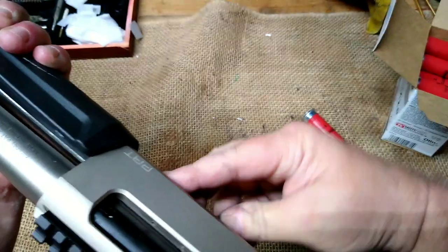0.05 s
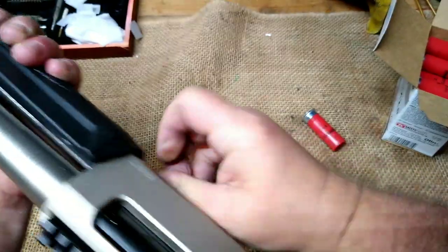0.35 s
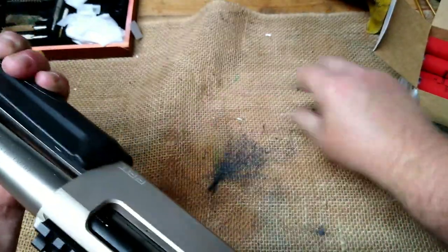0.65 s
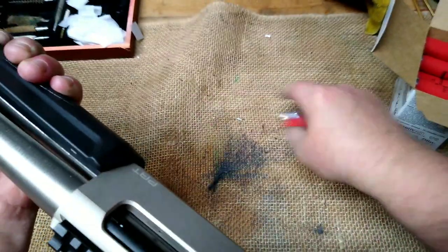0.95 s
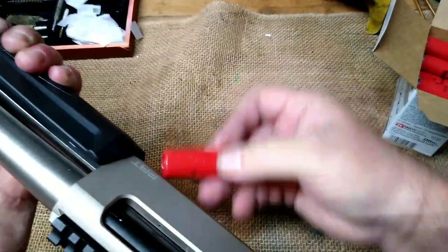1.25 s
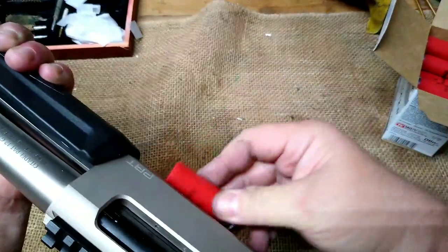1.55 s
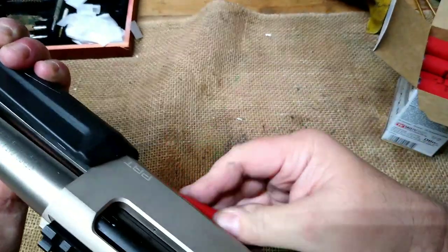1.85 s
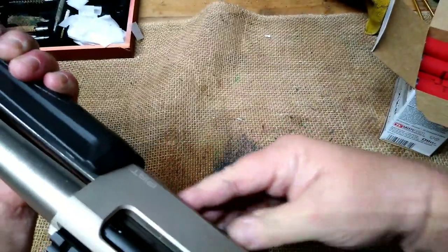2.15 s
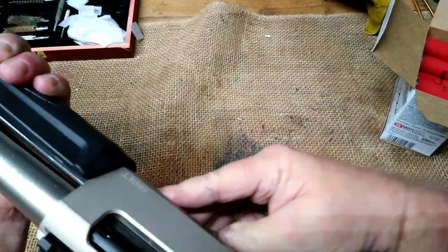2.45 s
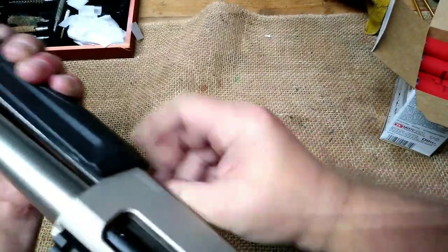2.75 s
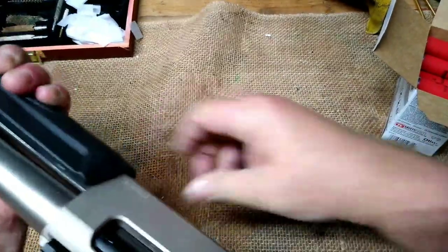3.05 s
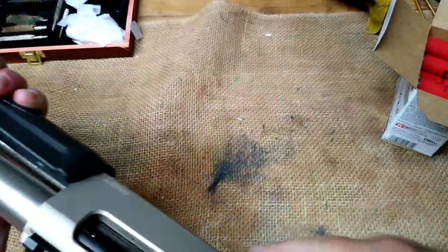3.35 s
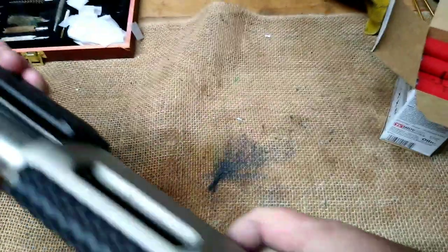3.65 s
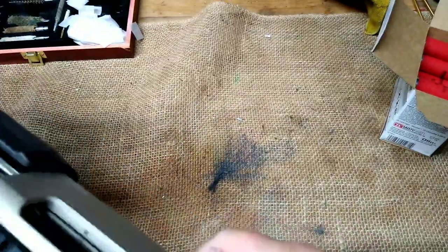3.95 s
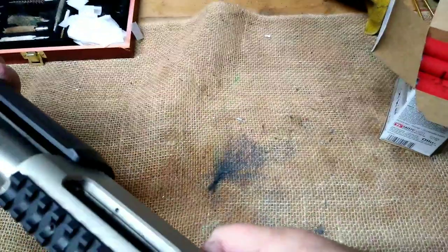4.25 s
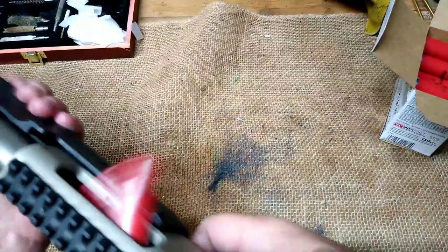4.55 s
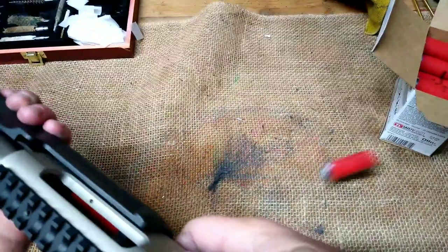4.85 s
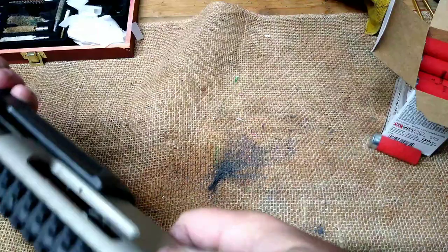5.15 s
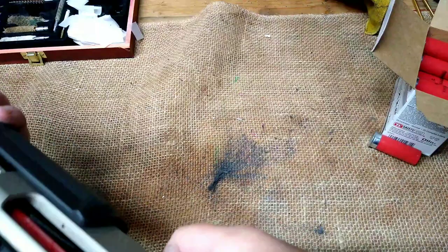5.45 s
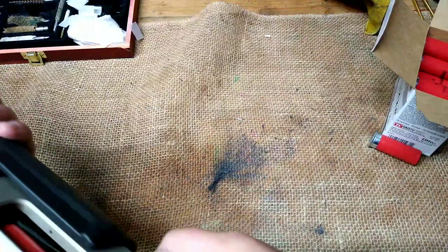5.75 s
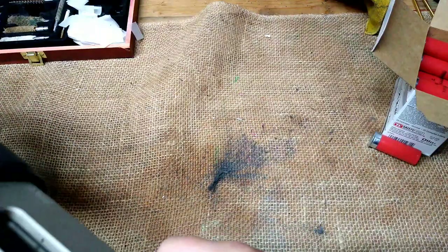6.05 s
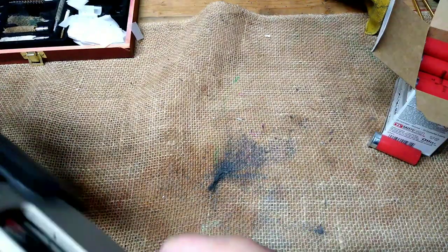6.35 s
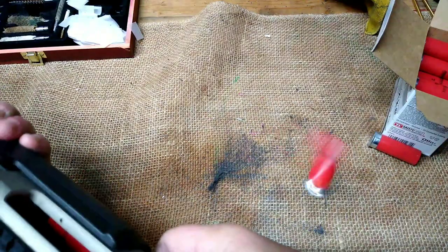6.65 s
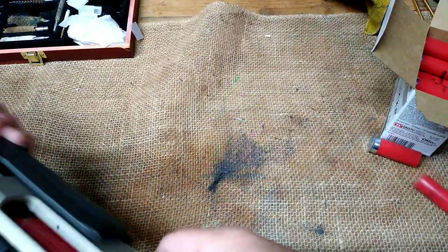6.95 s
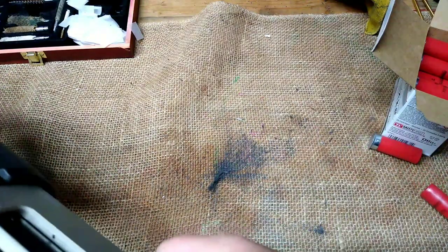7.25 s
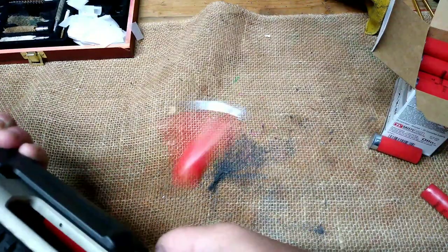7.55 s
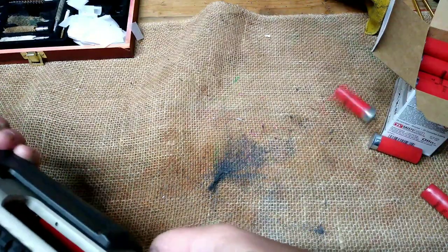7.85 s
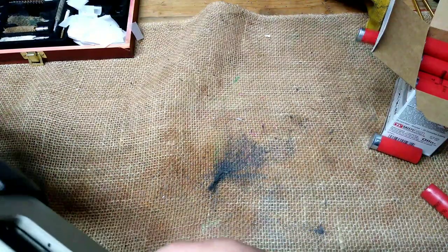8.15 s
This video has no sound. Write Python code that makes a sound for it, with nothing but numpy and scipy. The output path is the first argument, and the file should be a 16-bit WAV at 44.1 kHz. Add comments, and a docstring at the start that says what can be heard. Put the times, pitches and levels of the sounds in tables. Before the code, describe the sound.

In a small room, close to the microphone, a pump shotgun is handled with soft rustling and light clicks. Two shells scrape and squeak into the magazine tube and snap into place. Then the action is pumped three times, the last two in quick succession: rails rasp, steel parts clack hard and the barrel rings briefly. After each pull, a shell lands with a dull knock on cloth over wood.

```python
"""Loading and racking a pump shotgun.

Two shells are thumbed into the magazine, scraping and squeaking until the latch snaps. The slide is
then racked three times: the steel action clacks, the barrel rings, and each ejected shell thuds on a
cloth-covered wooden bench. Small room; close microphone with a limiter and little treble above 8 kHz."""
import sys
import numpy as np
from scipy import signal
from scipy.fft import rfft, irfft
from scipy.io import wavfile
from scipy.ndimage import uniform_filter1d, minimum_filter1d

SR = 44100
rng = np.random.default_rng(int(sys.argv[2]) if len(sys.argv) > 2 else 0)


def materialize(psi):
    """Save the field psi as 16-bit PCM at rate SR to the path in sys.argv[1].

    A 1-D psi becomes a single channel; in a 2-D psi each row is a channel.
    """
    bounded = np.clip(np.atleast_2d(psi).T, -1, 1)
    quanta = np.round(bounded * 32767).astype(np.int16)
    wavfile.write(sys.argv[1], SR, quanta)


N = 370862
TIME_S = np.arange(N) / SR
AGE_S = np.arange(2 ** 15) / SR  # time since a blow
SCENE_HZ, BLOW_HZ = np.fft.rfftfreq(N, 1 / SR), np.fft.rfftfreq(len(AGE_S), 1 / SR)


def amp(db):
    """Decibels to gain."""
    return 10 ** (np.asarray(db) / 20)


def unit_rms(x):
    """Scales to rms 1."""
    return x / np.sqrt(np.mean(x ** 2) + 1e-20)


def curve(points, hz):
    """Interpolates (f, value) points over log frequency."""
    f, value = np.transpose(points)
    return np.interp(np.log(hz + 1), np.log(f), value)


def add(mix, t_s, sound):
    """Mixes a sound in at t_s."""
    part = mix[max(round(t_s * SR), 0):][:len(sound)]
    part += sound[:len(part)]


def colour(x, gain_db):
    """Minimum-phase filter, one gain per bin: nothing sounds before the blow."""
    cepstrum = irfft(np.log(amp(gain_db)), len(x))
    cepstrum[1:len(x) // 2] *= 2
    cepstrum[len(x) // 2 + 1:] = 0
    return irfft(rfft(x) * np.exp(rfft(cepstrum)), len(x))


def noise(spectrum):
    """Steady shaped noise, rms 1."""
    return unit_rms(irfft(rfft(rng.standard_normal(N)) * amp(curve(spectrum, SCENE_HZ)), N))


def flutter(count, smooth_samples):
    """Smoothed random wander, rms 1."""
    return unit_rms(uniform_filter1d(rng.standard_normal(count), size=smooth_samples))


def decay(t60_s):
    """Envelope falling 60 dB in t60_s."""
    return np.exp(-np.log(1000) * AGE_S / max(t60_s, 1e-3))


def bell(hz, centre_hz, width_hz):
    """Resonance curve, 0-1."""
    return 1 / (1 + ((hz - centre_hz) / width_hz) ** 2)


def favour(modes, spot_hz, boost_db):
    """The struck spot drives modes near one pitch harder."""
    return [(hz, db + boost_db * bell(hz, spot_hz, width_hz=36), t60_s) for hz, db, t60_s in modes]


def ring(modes, spread_db=1.0):
    """Damped modes, starting rms 1; each blow shares its energy differently."""
    hz, db, t60_s = np.transpose(modes)
    gains = amp(db + spread_db * rng.standard_normal(len(hz)))
    phases = rng.uniform(0, 2 * np.pi, len(hz))
    sound = sum(gain * np.sin(2 * np.pi * f * AGE_S + phase) * decay(t60)
                for gain, f, t60, phase in zip(gains, hz, t60_s, phases))
    return sound / np.sqrt(np.sum(gains ** 2) / 2)


# noise spectra: f/Hz, level/dB
HUSH_SPECTRUM = [(20, -63), (45, -10.5), (80, -8.5), (150, 3), (230, 4), (330, -1.5), (500, -3.5),
                 (750, -20.5), (1500, -18), (8000, -56.5)]
RUSTLE_SPECTRUM = [(100, -3), (600, 0), (1100, 0.5), (2000, -4.5), (3200, -9.5), (4500, -16), (7500, -25.5),
                   (16000, -57)]
RUMBLE_SPECTRUM = [(20, -23), (50, -2.5), (80, 9.5), (120, 1), (170, 5), (260, -3.5), (400, -18),
                   (900, -45)]
# rustle envelope: t/s, level/dB
RUSTLE_LEVELS = [(0.1, -49.5), (0.39, -55), (0.54, -41), (0.89, -52.5), (1.14, -55), (1.67, -48.5),
                 (2.0, -51.5), (2.28, -44.5), (2.52, -54.5), (2.87, -49), (3.06, -45.5), (3.25, -51.5),
                 (4.05, -48.5), (4.24, -46.5), (4.49, -50.5), (4.6, -51)]


def background(hush_db=-47, rumble_from_s=6.16, rumble_db=-34.5, rest_db=-60.5, ease_db_per_s=4.5):
    """Room hush, rustling hands, and a rumble of hard handling that slowly eases."""
    hush = amp(hush_db) * noise(HUSH_SPECTRUM)
    rustle = amp(np.interp(TIME_S, *np.transpose(RUSTLE_LEVELS)) - 1) * noise(RUSTLE_SPECTRUM)
    worked_s = TIME_S - rumble_from_s
    rumble_gain = amp(np.where(worked_s > 0, rumble_db - ease_db_per_s * worked_s, rest_db))
    return hush + rustle + rumble_gain * noise(RUMBLE_SPECTRUM)


# room decay: f/Hz, t60/s
ROOM_DECAY = [(100, 0.44), (400, 0.31), (1500, 0.31), (4000, 0.25), (8000, 0.31)]


def room(x, first_s=0.0031, echoes_per_s=3000):
    """Sparse reflections of random sign; each band decays at its own rate."""
    signs = rng.choice([-1., 1.], len(AGE_S))
    arrivals = (rng.random(len(AGE_S)) < echoes_per_s / SR) * (AGE_S > first_s)
    hz, t_s, bands = signal.stft(signs * arrivals, SR, nperseg=256)
    fade = np.exp(-np.log(1000) * t_s / curve(ROOM_DECAY, hz)[:, None])
    tail = signal.istft(bands * fade, SR, nperseg=256)[1]
    return signal.fftconvolve(x, tail / np.linalg.norm(tail))[:N]


def rub(strokes, spectrum, swell_db_per_s, release_s, catch_db=0, grain_db=5, attack_s=0.004):
    """Sliding friction: fine slips and coarser catches; each stroke swells to its end, then dies."""
    slips = rng.standard_normal(N) * amp(grain_db * flutter(N, 30))
    catches = amp(catch_db * flutter(N, 250))
    envelope = np.zeros(N)
    for start_s, end_s, db in strokes:
        attack = np.clip((TIME_S - start_s) / attack_s, 0, 1)
        swell = amp(db - swell_db_per_s * np.maximum(end_s - TIME_S, 0))
        release = np.exp(-np.maximum(TIME_S - end_s, 0) / release_s)
        envelope += attack * swell * release
    return envelope * unit_rms(colour(slips * catches, curve(spectrum, SCENE_HZ)))


# shell pushes: start/s, end/s, final level/dB
FEED_STROKES = [(0.012, 0.022, -42), (0.345, 0.525, -28.5), (2.24, 2.252, -40), (2.355, 2.372, -40.5),
                (2.395, 2.412, -37), (2.89, 2.968, -24)]
# magazine tube: f/Hz, level/dB
TUBE_SPECTRUM = [(100, -4.5), (700, -5.5), (1200, -6.5), (1650, -1.5), (1900, 10), (2450, -4), (3250, 4.5),
                 (3800, -3), (4800, -6), (5600, -5), (6400, -6), (16000, -54)]


def shell_scrape():
    """A shell scrapes into the tube, harder as the spring compresses."""
    return amp(-1) * rub(FEED_STROKES, TUBE_SPECTRUM, swell_db_per_s=125, release_s=0.0096, catch_db=2)


# slide travel: start/s, end/s, final level/dB
SLIDE_STROKES = [(4.70, 4.82, -20.5), (5.15, 5.19, -22.5), (5.845, 5.88, -42), (6.09, 6.20, -19.5),
                 (6.62, 6.715, -20), (7.16, 7.33, -19.5), (7.59, 7.71, -20), (8.13, 8.19, -20)]
# rails: f/Hz, level/dB
RAIL_SPECTRUM = [(100, -16), (400, 0), (700, 8), (1500, 9), (3000, 6.5), (5500, 7), (7500, -2.5),
                 (10000, -5.5), (16000, -9.5)]


def slide_rub():
    """The slide rubs along its rails, louder as it gathers speed."""
    return amp(-1) * rub(SLIDE_STROKES, RAIL_SPECTRUM, swell_db_per_s=62.5, release_s=0.025)


# hull on tube: t/s, length/s, first f/Hz, last f/Hz, level/dB
HULL_SQUEAKS = [(0.438, 0.077, 3160, 2530, -30), (0.483, 0.031, 5900, 5630, -28),
                (2.9, 0.0087, 5350, 5460, -22.5), (2.908, 0.04, 2307, 3365, -28.5)]


def hull_squeaks(waver=0.12):
    """Stick-slip of the plastic hull: a ragged tone gliding with thumb pressure."""
    out = np.zeros(N)
    for t_s, length_s, first_hz, last_hz, db in HULL_SQUEAKS:
        count = int(length_s * SR)
        hz = np.linspace(first_hz, last_hz, count) * (1 + waver * flutter(count, 40))
        tone = np.sin(2 * np.pi * np.cumsum(hz) / SR)
        grip = abs(flutter(count, 40))
        add(out, t_s, amp(db) * np.hanning(count) * unit_rms(grip * tone))
    return out


# planks: f/Hz, level/dB, t60/s
BENCH_MODES = [(158.3, -13, 0.19), (287.4, -5, 0.071), (367.4, -5.5, 0.21), (390.7, -6, 0.082),
               (446, -17.5, 0.23), (454.4, -7, 0.17), (587, -15.5, 0.22), (668.7, -0.5, 0.066),
               (664, -9, 0.14), (952, -7.5, 0.1)]
# knock on wood: f/Hz, level/dB
WOOD_SPECTRUM = [(40, -61), (100, -18), (160, 1.5), (240, -17), (400, 6), (680, 5), (850, -1.5), (1500, -1),
                 (3000, -10.5), (8000, -26)]
# landings and bounces: t/s, level/dB, spot f/Hz, low-pass corner/Hz
SHELL_LANDINGS = [(5.022, -4, 975, 3300), (5.028, -0.5, 430, 890), (5.055, -4.5, 432, 650),
                  (5.203, -4.5, 450, 740), (5.231, -17.5, 400, 600), (5.287, -14.5, 296, 450),
                  (6.946, -0.5, 668, 744), (6.952, 0, 687, 2500), (7.011, -13, 354, 600),
                  (7.036, -9.5, 374, 450), (7.940, 0.5, 570, 720), (7.952, -1, 466, 2120),
                  (8.09, -12.5, 490, 800), (8.103, -3, 600, 790)]


def bench_thuds(knock_t60_s=0.058):
    """Shells drop on cloth over planks; the brass end hits harder and brighter than the plastic."""
    out = np.zeros(N)
    for t_s, db, spot_hz, corner_hz in SHELL_LANDINGS:
        contact = rng.standard_normal(len(AGE_S)) * decay(knock_t60_s)
        knock = unit_rms(colour(contact, curve(WOOD_SPECTRUM, BLOW_HZ))) * np.std(contact)
        planks = ring(favour(BENCH_MODES, spot_hz, boost_db=6), spread_db=0.9)
        cushion_db = -10 * np.log10(1 + (BLOW_HZ / corner_hz) ** 4)
        add(out, t_s, amp(db - 2) * colour(amp(-3) * knock + amp(-5) * planks, cushion_db))
    return out


# steel contact: f/Hz, level/dB
STEEL_SPECTRUM = [(40, -25.5), (150, -5.5), (350, 4), (700, 0.5), (1500, 3), (2500, 5), (4000, 4),
                  (5500, 1.5), (7500, -2), (16000, -36.5)]


def steel_strike(modes, bass_db, treble_db, rattle_t60_s, crack_db, crack_t60_s, ring_db, grain_db,
                 body_db=6, bass_hz=1100, treble_hz=4000):
    """Steel on steel: a crack and a chatter of tiny contacts, coloured by the part, which rings on."""
    hiss = rng.standard_normal(len(AGE_S))
    chatter = unit_rms(amp(grain_db * flutter(len(AGE_S), 44))) * decay(rattle_t60_s)
    crack = amp(crack_db) * decay(crack_t60_s)
    resonances = np.max([bell(BLOW_HZ, hz, width_hz=44) for hz, _, _ in modes], axis=0)
    part_db = curve(STEEL_SPECTRUM, BLOW_HZ) + body_db * (resonances - 0.5)
    contact = colour(hiss * (chatter + crack), part_db)
    low_shelf_db = bass_db / (1 + (BLOW_HZ / bass_hz) ** 4)
    high_shelf_db = treble_db * BLOW_HZ ** 3 / (BLOW_HZ ** 3 + treble_hz ** 3)
    return colour(contact + amp(ring_db) * ring(modes), low_shelf_db + high_shelf_db)


# shell latch: f/Hz, level/dB, t60/s
LATCH_MODES = [(787, -5, 0.096), (1123, -19, 0.045), (1620, -16, 0.036), (1958, 14.5, .03),
               (2012, 2, 0.083), (2430, -6, 0.04), (3460, -4.5, 0.075), (4150, -17.5, 0.091),
               (4770, -4, 0.03), (5900, -9, 0.074), (6260, -15, .04), (6900, -11, 0.04)]
# snaps: t/s, level/dB, bass/dB, treble/dB, ring/dB
LATCH_SNAPS = [(0.022, -3.5, 4, -2.5, -9), (0.538, 3.5, -9, -7.5, -5), (2.252, 0.5, 4.5, -17.5, -22),
               (2.976, 3, -3.5, -6, -5.5), (4.689, -2.5, 2, -26, -12), (5.115, -8, -2, -19, 0.5),
               (5.139, -12, 11, -10, 2.5), (6.03, -9, -6, -14, 0), (7.152, -5.5, -3, -25, -3),
               (8.111, -19, -3, -8, 8)]


def latch(rebound_s=0.0027, rebound_db=-4.5, rebound_treble_db=9.5, highpass_hz=620):
    """The latch springs over a brass rim, rebounds and rings; so small a part radiates little bass."""
    out = np.zeros(N)
    for t_s, db, bass_db, treble_db, ring_db in LATCH_SNAPS:
        for delay_s, drop_db, bright_db in ((0, 0, 0), (rebound_s, rebound_db, rebound_treble_db)):
            snap = steel_strike(LATCH_MODES, bass_db, treble_db + bright_db, rattle_t60_s=0.031,
                                crack_db=-7, crack_t60_s=0.0079, ring_db=ring_db,
                                grain_db=-1.5, body_db=7.5)
            add(out, t_s + delay_s, amp(db + drop_db - 8.5) * snap)
    return signal.sosfilt(signal.butter(3, highpass_hz, "highpass", fs=SR, output="sos"), out)


# receiver: f/Hz, level/dB, t60/s
RECEIVER_MODES = [(660, -8.5, 0.022), (835, -5, 0.027), (986, 8, 0.018), (1206, 13.5, 0.035),
                  (1515, 9, .13), (1716, 6, 0.11), (2000, -22.5, 0.03), (2253, 10.5, 0.075),
                  (2653, -15, 0.033), (3257, -6.5, 0.037), (3796, 2, 0.07), (4120, -26.5, 0.059),
                  (5110, -8, 0.073)]


def receiver_knock(spot_hz, bass_db, treble_db, rattle_t60_s, crack_db, ring_db, spot_db, width_hz):
    """A blow on the receiver, boosted around the pitch of the struck spot."""
    blow = steel_strike(RECEIVER_MODES, bass_db, treble_db, rattle_t60_s, crack_db,
                        crack_t60_s=0.02, ring_db=ring_db, grain_db=3.5)
    return colour(blow, spot_db * bell(BLOW_HZ, spot_hz, width_hz))


# light taps: t/s, level/dB, spot f/Hz, treble/dB
HANDLING_TAPS = [(0.3528, -23, 1900, -11), (0.6837, -25, 1990, -12), (0.7109, -9.5, 2540, -3.5),
                 (1.473, -16.5, 1750, -13), (1.5002, -16, 1380, -10), (1.8143, -29, 1070, -19),
                 (2.0087, -25.5, 810, -20), (2.1985, -35.5, 3110, 10), (2.4119, -17.5, 3030, -2),
                 (2.8586, -20, 2110, 3.5), (3.1378, -21, 2310, -9), (3.2136, -10.5, 802, -3),
                 (4.059, -21, 1030, -24), (4.1086, -30, 896, -5), (4.2696, -22.5, 805, -14),
                 (4.402, -21.5, 2250, 0), (4.4314, -35, 1990, 3), (4.6741, -17, 1620, -10),
                 (4.8084, -4, 1670, 4.5), (4.8316, -12, 1870, -1), (4.868, -15.5, 3850, 0),
                 (4.9502, -17.5, 2120, 5), (5.3547, -24.5, 867, -11), (5.8434, -13.5, 1510, -15),
                 (5.8834, -19.5, 3820, -4), (5.92, -21, 1010, -22), (6.4183, -20, 1100, -18),
                 (6.7098, -7, 1950, 10.5), (6.8052, -19.5, 2030, -9), (7.0397, -9, 3300, -10.5),
                 (7.554, -21.5, 820, -3), (7.7192, -1.5, 930, -14)]


def handling_taps(thinning=0.16):
    """Shells, fingers and loose parts tap the gun; brighter taps have less bass."""
    out = np.zeros(N)
    for t_s, db, spot_hz, treble_db in HANDLING_TAPS:
        bass_db = 1.5 - thinning * treble_db
        tap = receiver_knock(spot_hz, bass_db, treble_db, rattle_t60_s=0.078,
                             crack_db=2.5, ring_db=-26.5, spot_db=6.5, width_hz=300)
        add(out, t_s, amp(db - 14) * tap)
    return out


# contact chains: delay/s, level/dB, spot f/Hz, bass/dB, treble/dB, rattle t60/s
TRIP_CHAIN = [(0, -1, 1605, -3.5, 4, 0.12), (0.0116, -18.5, 1730, -2, 6, .055)]  # bolt or carrier breaks free, rebounds
EJECT_CHAIN = [(-.012, -10.5, 3500, 2, 2.5, 0.087), (0, 2, 1000, 9, -2, 0.043),
               (.007, -2, 1240, 5, 0, .045), (0.0216, 2, 1800, 3.5, 2, 0.052)]  # run-in, rear stop, bounce, ejector
LIFT_CHAIN = [(0, 3.5, 1050, 5.9, 2, .07), (.011, -5, 900, 7.7, 0.81, 0.048),
              (.023, -7.5, 1050, 10.7, 0, .055)]  # next shell knocks up the feed ramp
LOCK_CHAIN = [(-.037, 7, 4900, 0, -5, 0.042), (-.02, -3.5, 1350, 3.5, -13, 0.023),
              (-.0085, -0.5, 1540, 6.5, -3.5, 0.061), (0, -1.5, 2200, 9, 11.5, 0.027)]  # bolt meets shell, shell seats, lug locks, front stop
# moves: t/s, level/dB, time stretch, brightness/dB
TRIP_MOVES = [(4.7093, -1.5, 1.2, -4), (6.5728, -3, 2, -3), (6.6105, -2, 2.2, -1),
              (7.1791, -5.5, .8, -10.5), (7.5874, -2.5, 2.7, -2.5), (7.6179, -2.5, 0.68, -2.5),
              (8.1372, -5, 1, -4)]
LIFT_MOVES = [(5.163, -7, 1.03, -2), (6.0379, -9.5, 1.88, -3.5), (7.1996, -6.5, 0.88, 0.5),
              (8.1619, -10.5, 0.72, -3)]
# moves ending at a stop: t/s, level/dB, time stretch, brightness/dB, sway/dB, barrel f/Hz
EJECT_MOVES = [(4.7658, -1, 1.03, 0, -59, 3820), (6.6625, -3.5, 0.96, -0.5, -31, 1545),
               (7.6765, -2, .63, 3.5, -42.5, 1545)]
LOCK_MOVES = [(6.1585, -2, 0.95, 0.58, -22, 2530), (7.2954, -1, 1.08, 0, -30, 1545),
              (8.2387, 2.5, 0.83, 0.65, -24, 2234)]


def action_clacks():
    """Each move of the action plays its chain of steel contacts at its own force and speed."""
    out = np.zeros(N)
    for moves, chain in ((TRIP_MOVES, TRIP_CHAIN), (EJECT_MOVES, EJECT_CHAIN),
                         (LIFT_MOVES, LIFT_CHAIN), (LOCK_MOVES, LOCK_CHAIN)):
        for t_s, force_db, stretch, bright_db, *_ in moves:
            for delay_s, db, spot_hz, bass_db, treble_db, t60_s in chain:
                clack = receiver_knock(spot_hz, bass_db - bright_db, treble_db + bright_db, t60_s,
                                       crack_db=-12.5, ring_db=-19, spot_db=7.5, width_hz=137)
                add(out, t_s + stretch * delay_s, amp(force_db + db - 6.5) * clack)
    return out


# barrel: f/Hz, level/dB, t60/s
BARREL_MODES = [(1000, -6.5, .52), (1136, -5, .25), (1545, 2, .36), (1610, -1, .38), (2160, 0, .26),
                (2234, 0, .26), (2530, -6.5, .55), (2650, -6, .35), (2864, -6, .2), (3515, -4, .38),
                (3770, -1, .38), (3838, -3, .35), (5582, -9, .22), (6245, -9, .22)]
# end-stop shocks: delay/s, thump/dB, barrel ring/dB, spring buzz/dB
REAR_SHOCKS = [(.001, -18, -23, -22.5), (.023, -15.5, -27, -24.5)]
FRONT_SHOCKS = [(0, -8, -19.5, -18.5)]


def stop_jolts(thump_hz=200, sway_hz=55, buzz_rise_s=0.012):
    """At an end stop the stock thumps and sways, the barrel rings and the magazine spring buzzes."""
    out = np.zeros(N)
    thump = 2 * np.sin(2 * np.pi * thump_hz * AGE_S) * decay(t60_s=0.013)
    sway = np.sin(2 * np.pi * sway_hz * AGE_S) * decay(t60_s=0.3)
    buzz_envelope = decay(t60_s=0.35) * (1 - np.exp(-AGE_S / buzz_rise_s))
    for moves, shocks in ((EJECT_MOVES, REAR_SHOCKS), (LOCK_MOVES, FRONT_SHOCKS)):
        for t_s, db, stretch, _, sway_db, barrel_hz in moves:
            for delay_s, thump_db, ring_db, buzz_db in shocks:
                stock = amp(thump_db) * thump + amp(sway_db) * sway
                coils = colour(rng.standard_normal(len(AGE_S)), curve(STEEL_SPECTRUM, BLOW_HZ))
                spring = amp(buzz_db - 1) * unit_rms(coils) * buzz_envelope
                barrel = amp(ring_db) * ring(favour(BARREL_MODES, barrel_hz, boost_db=4), spread_db=4.5)
                add(out, t_s + stretch * delay_s, amp(db) * (stock + barrel + spring))
    return out


def scene():
    """Gun close by, bench a little farther, both in the room."""
    gun = latch() + handling_taps() + action_clacks() + stop_jolts()
    gun += shell_scrape() + slide_rub() + hull_squeaks()
    bench = bench_thuds()
    reflections = room(amp(-12) * gun + amp(-4.5) * bench)
    return (gun + bench + reflections + background())[None]


# microphone response: f/Hz, level/dB
MIC_RESPONSE = [(15, -20.5), (30, -21.5), (45, -1.5), (7700, 2.5), (8120, -12.5), (8700, -26.5),
                (15000, -26)]


def record(dry, ceiling_db=0.5, recover_db_per_s=300, lowpass_hz=15900):
    """Dull microphone, fast limiter, soft overload, band limit."""
    x = colour(dry[0], curve(MIC_RESPONSE, SCENE_HZ))
    over_db = np.maximum(20 * np.log10(abs(x) + 1e-9) - ceiling_db, 0)
    recovery_db = TIME_S * recover_db_per_s
    held_db = np.maximum.accumulate(over_db + recovery_db) - recovery_db
    x = x * amp(uniform_filter1d(minimum_filter1d(-held_db, size=41), size=41))  # look-ahead
    x = x / (1 + x ** 6) ** (1 / 6)  # soft clip
    lowpass = signal.firwin(511, lowpass_hz, window=("kaiser", 9), fs=SR)
    return signal.oaconvolve(x, lowpass, "same")[None]


dry = scene()
out = record(dry)
materialize(out)
```